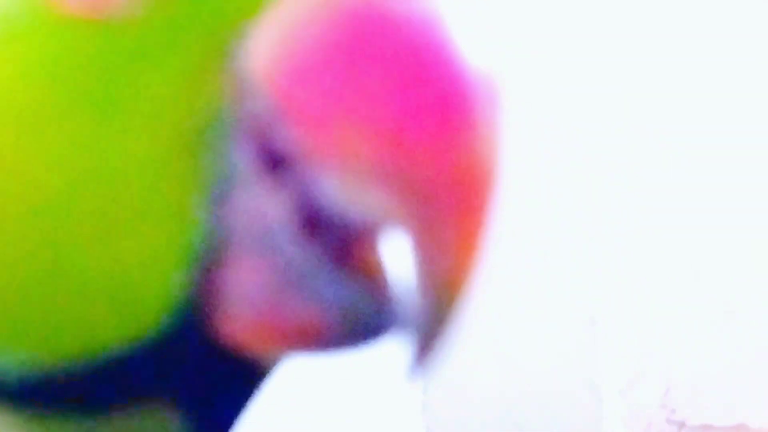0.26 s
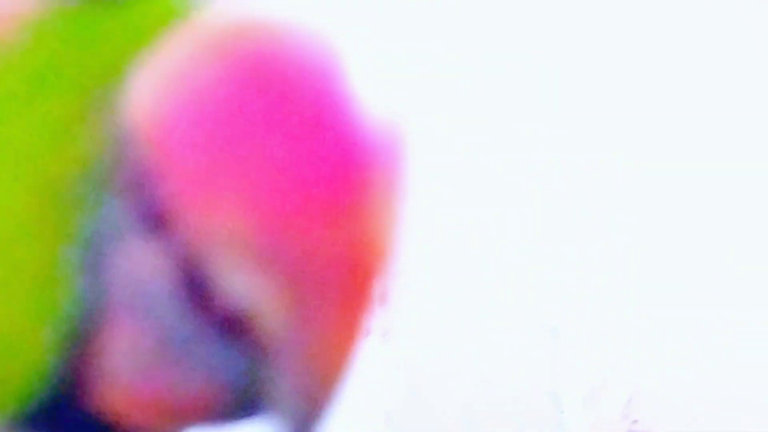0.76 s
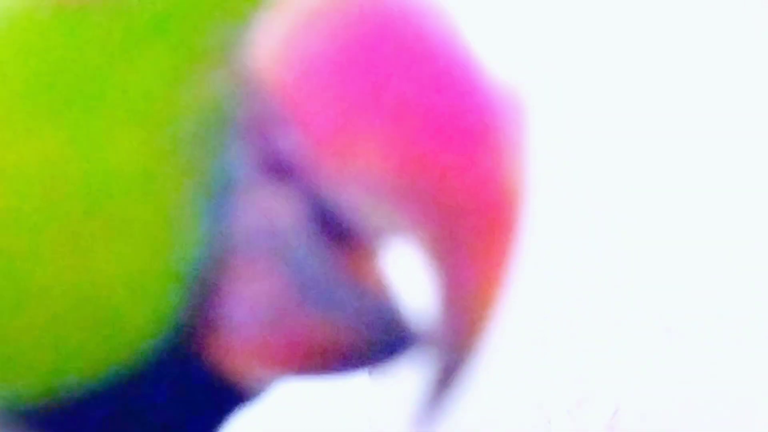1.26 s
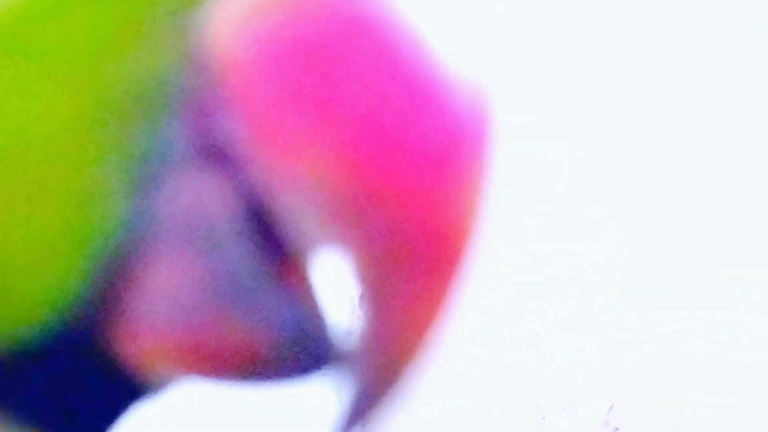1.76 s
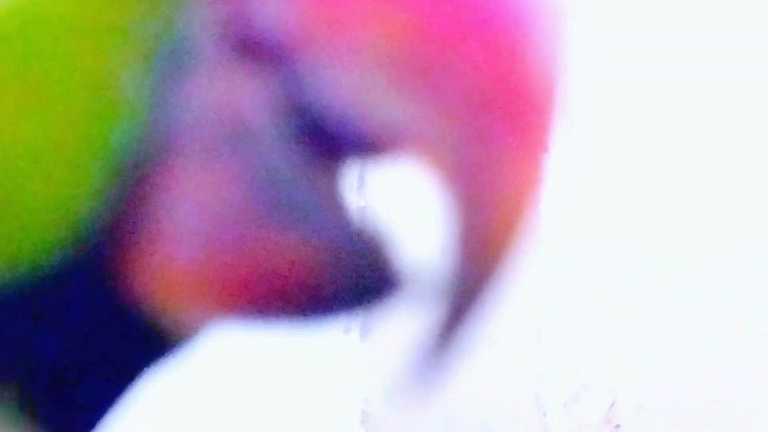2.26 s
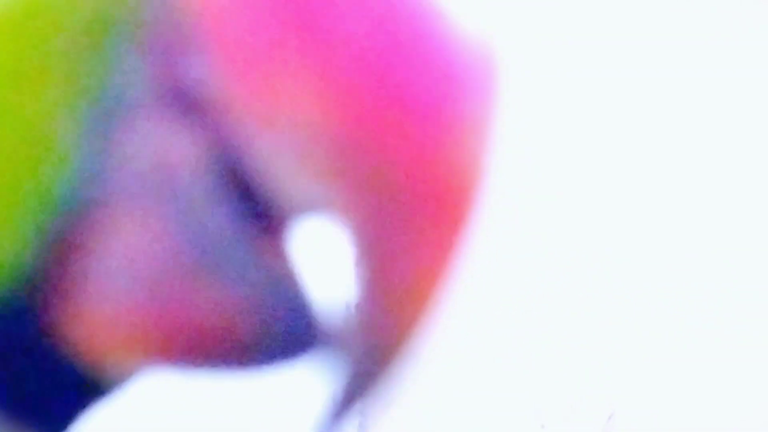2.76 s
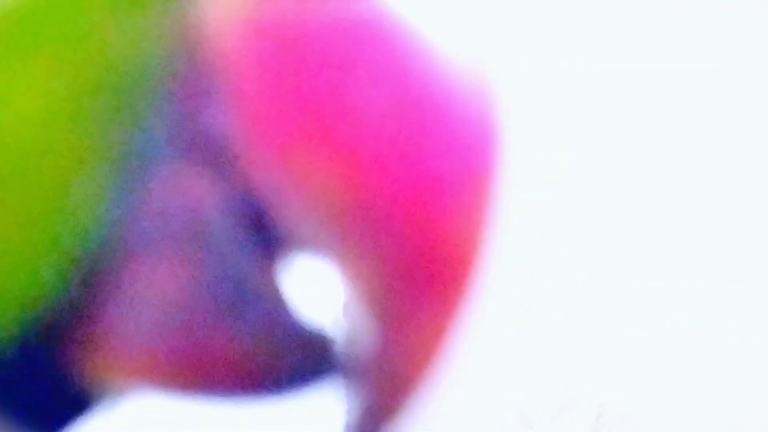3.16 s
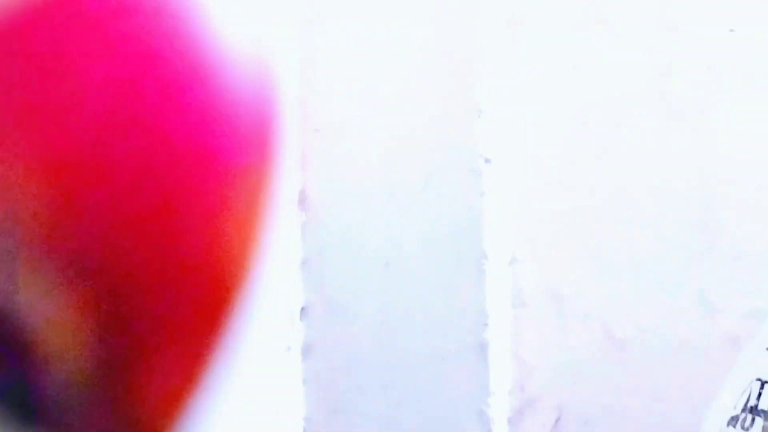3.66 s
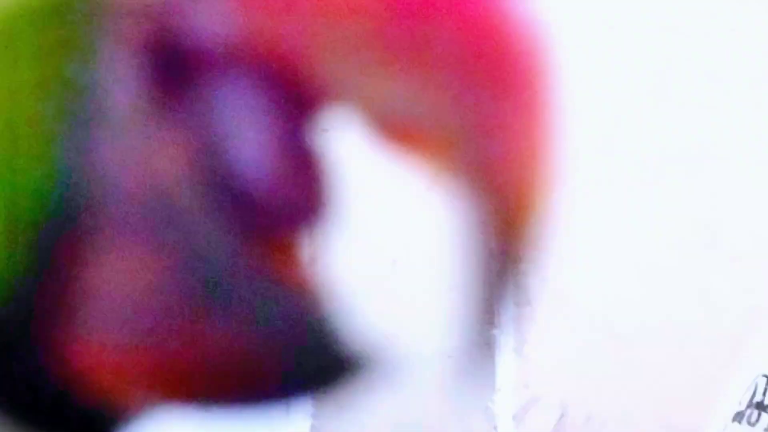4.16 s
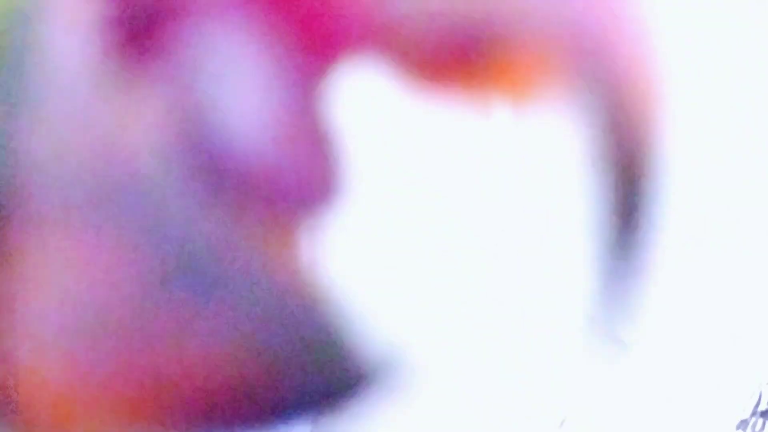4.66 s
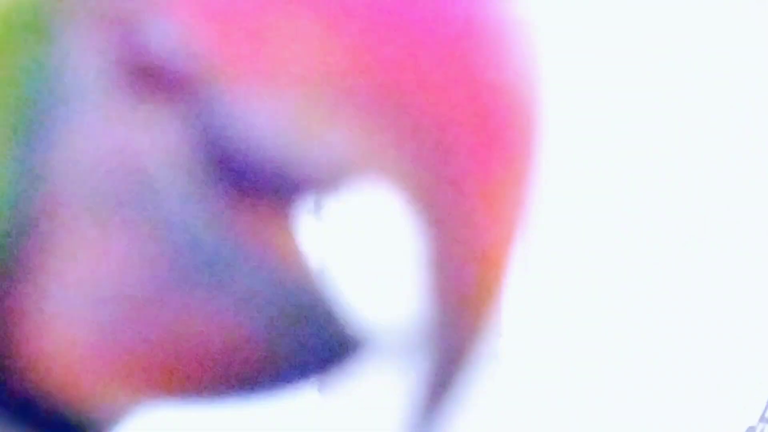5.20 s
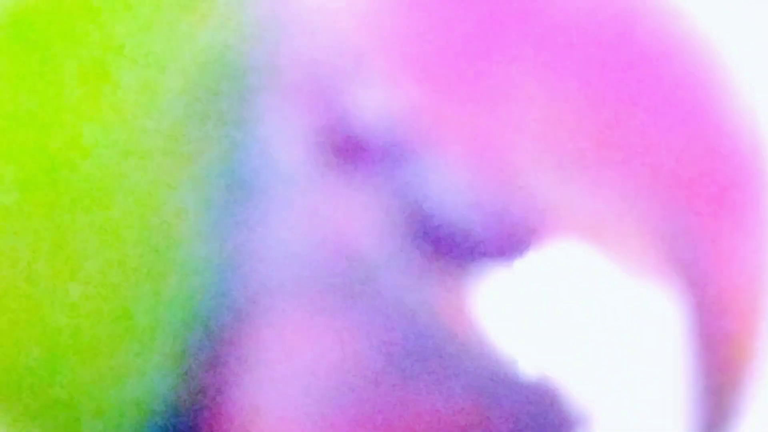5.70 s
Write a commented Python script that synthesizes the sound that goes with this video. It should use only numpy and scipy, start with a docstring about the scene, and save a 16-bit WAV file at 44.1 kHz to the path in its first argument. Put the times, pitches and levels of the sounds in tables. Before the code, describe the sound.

A pet parakeet calls beside the microphone in a small room with a short ring. A low motor-like hum and soft rumble waver throughout. From the start to about 0.85 s come four short raspy screeches, roughly a quarter second apart, each scooping up quickly and sagging, slightly to the right. Three similar ones follow at 1.4, 1.65 and 1.9 s, the first breaking briefly into a whistle. A soft thump falls near 2.2 s; then the bird pauses, with faint gliding chirps behind. At 3.15 s a much louder, clear, dry call rises and falls for a third of a second, cracking into a high whistle; a shorter one follows at 3.6 s, both opening with tiny ticks. Quiet chirps again, then two softer, lower, rounder yelps at 4.7 and 4.95 s. Low bumps land around 5.1 to 5.2 s, and hum with fading chirps remains until 6 s.

```python
"""A pet parakeet calls in four bouts near the microphone in a small room: seven raspy screeches, two loud clear
calls, two softer yelps. Each is a bank of unsteady partials and pulsed noise, shaped by throat and head direction;
three break into a whistle.
Around them: faint gliding chirps, filtered-noise ticks and soft low thumps, over wavering hum tones and
a rumble of noise bands."""
import sys
import numpy as np
from scipy import signal
from scipy.fft import rfft, irfft, next_fast_len
from scipy.io import wavfile
from scipy.ndimage import uniform_filter1d

SR = 44100
rng = np.random.default_rng(int(sys.argv[2]) if len(sys.argv) > 2 else 0)


def master(y):
    """Save y as 16-bit WAV."""
    cut = np.clip(np.atleast_2d(y).T, -1, 1)
    pcm = np.round(cut * 32767)  # scale
    wavfile.write(sys.argv[1], SR, pcm.astype(np.int16))


N = 261954
TIME_S = np.arange(N) / SR
SIDES = np.array([[1], [-1]])   # left, right
CUTOFF_HZ = 15300   # top of the partials and of the output


def from_db(db):
    """Decibels to amplitude gain."""
    return np.exp(np.asarray(db) * (np.log(10) / 20))


def rms_one(x):
    """Scale to rms 1."""
    return x / np.sqrt(np.mean(x ** 2) + 1e-20)


def at_hz(points, hz, axis=1):
    """Interpolate one column of a spectrum on a log-frequency axis."""
    points = np.array(points)
    return np.interp(np.log(np.maximum(hz, 1)), np.log(points[:, 0]), points[:, axis])


def butter(x, hz, kind, order=2):
    """Butterworth filter."""
    return signal.sosfilt(signal.butter(order, hz, kind, fs=SR, output="sos"), x)


def drift(rate_hz, size):
    """Random curve of spread 1 that moves at about this rate."""
    knots = rng.standard_normal(int(2 * rate_hz * size / SR) + 3)
    curve = np.interp(np.arange(size) * 2 * rate_hz / SR, np.arange(len(knots)), knots)
    return curve * np.sqrt(3 / 2)   # restores the spread lost between knots


def panned(pan_db):
    """Left and right gains that keep the power; positive is left."""
    gains = from_db(SIDES * pan_db / 2)
    return gains / np.sqrt(np.mean(gains ** 2, axis=0))


def evened(x, size=300):
    """Hold each channel near rms 1 from moment to moment."""
    return x / np.sqrt(np.abs(uniform_filter1d(x ** 2, size, axis=-1)) + 1e-12)


def add(out, start_s, sound):
    """Mix a sound in at its time."""
    at = max(round(start_s * SR), 0)
    out[:, at:at + sound.shape[-1]] += sound[..., :max(N - at, 0)]


def echoes(t60_s, delay_s, dull_hz):
    """Dense decaying reflections of unit energy, different in each channel."""
    t = TIME_S[:SR // 2]
    noise = butter(rng.standard_normal((2, len(t))), dull_hz, "low", order=1)
    tail = noise * from_db(-60 * t / t60_s) * (t > delay_s)
    return rms_one(tail) / np.sqrt(len(t))


# room noise spectrum: f/Hz, relative density/dB per Hz
RUMBLE_SPECTRUM = [(22, 4), (36, -2.5), (62, -1), (100, -8), (150, -9.5), (250, -11.5), (330, -17.5),
                   (500, -18), (750, -31), (1100, -31), (2300, -36), (4000, -44.5), (8000, -58.5),
                   (15000, -58.5)]
# correlation of the channels: f/Hz, likeness/0-1
RUMBLE_LIKENESS = [(60, 0.61), (125, 0.79), (250, 1), (500, 0.71), (950, .15), (2400, .02), (15000, 0.028)]
# channel balance: f/Hz, left-right/dB
RUMBLE_BALANCE = [(60, 4.5), (150, 2.5), (380, 3.5), (950, -1), (2380, -5), (5980, 2), (15000, 1.5)]
RUMBLE_DB = -32.25   # of the channel mean


def rumble(patchy_db):
    """Half-octave noise bands, most alike in both channels near 250 Hz, each flickering a little."""
    out, edges_hz = 0, 16 * 2 ** (np.arange(21) / 2)
    white = rng.standard_normal((2, 2, N))
    for k, (low_hz, high_hz) in enumerate(zip(edges_hz, edges_hz[1:])):
        mid, side = butter(white[k % 2], [low_hz, high_hz], "band")   # neighbours use separate noise
        hz = np.sqrt(low_hz * high_hz)
        alike = np.clip(at_hz(RUMBLE_LIKENESS, hz), 0, .99)
        stereo = mid + np.sqrt((1 - alike) / (1 + alike)) * side * SIDES
        level_db = at_hz(RUMBLE_SPECTRUM, hz) + patchy_db * drift(6, N)
        out = out + from_db(level_db) * panned(at_hz(RUMBLE_BALANCE, hz)) * stereo
    return from_db(RUMBLE_DB) * out / np.std(out.mean(axis=0))


# hum tones: f/Hz, mean level/dB rms
HUM_TONES = [(102.3, -41.5), (188.4, -42.5), (463.0, -54.5)]


def hum(waver_rad, pan_db):
    """Low motor-like sines that waver in phase, more so when higher, and in strength."""
    tones = 0
    for hz, level_db in HUM_TONES:
        wander = waver_rad * np.sqrt(hz / 100) * drift(5, N)
        strength = from_db(level_db + 2 * drift(3.7, N))
        tones = tones + strength * np.sin(2 * np.pi * hz * TIME_S + wander)
    return np.sqrt(2) * tones * panned(pan_db)


# soft thumps: peak t/s, f/Hz, peak level/dB, 1/e energy decay to either side/s
THUMP_EVENTS = [(2.17, 70.3, -17, 0.0038), (4.6, 70, -23, 0.0038), (5.091, 119, -10.5, 0.002),
                (5.136, 87, -27, 0.02), (5.212, 76.5, -20, 0.0046)]


def thumps():
    """Low tones that swell and die symmetrically about their peaks."""
    out, t = np.zeros((2, N)), TIME_S[:SR // 4]
    centred = t - t.mean()
    for peak_s, hz, peak_db, decay_s in THUMP_EVENTS:
        envelope = from_db(peak_db) * np.exp(-np.abs(centred) / (2 * decay_s))
        add(out, peak_s - t.mean(), envelope * np.cos(2 * np.pi * hz * centred))
    return out


# dry ticks: t/s, initial level before decay/dB, t60/s; level is that of the noise before its band-pass
TICK_EVENTS = [(1.076, -46, 0.42), (1.259, -48, .08), (3.141, -18, 0.031), (3.512, -44, 0.5),
               (3.593, -19, .025), (4.67, -26.5, .025), (4.925, -33, .025), (5.771, -64, .08)]


def ticks():
    """Bright noise bursts with exponential decay."""
    out, t = np.zeros((2, N)), TIME_S[:SR // 4]
    for start_s, level_db, t60_s in TICK_EVENTS:
        noise = butter(rng.standard_normal((2, len(t))), [2000, 9000], "band", order=1)
        add(out, start_s, noise * from_db(level_db - 60 * t / t60_s))
    return out


TWITTER_FROM_S, TWITTER_TO_S, TWITTER_LENGTH_S = 2.2, 5.8, 0.074
TWITTER_LOW_HZ, TWITTER_HIGH_HZ, TWITTER_HALF_WIDTH_HZ = 2500, 5160, 110
TWITTER_FALL = .06   # share of its pitch each chirp drops
TWITTER_DB, TWITTER_FADE_DB_PER_S = -50, 3.6   # before the chirp gain


def twitter(count):
    """Rows of short falling chirps at random times and pitches, slowly growing fainter."""
    when, height = rng.random((count, 2)).T
    after_s = (np.arange(count) + when) / count * (TWITTER_TO_S - TWITTER_FROM_S)
    pitches_hz = TWITTER_LOW_HZ * (TWITTER_HIGH_HZ / TWITTER_LOW_HZ) ** height
    rows = []
    for s, hz in zip(after_s, pitches_hz):
        start_s, level_db = TWITTER_FROM_S + s, TWITTER_DB - TWITTER_FADE_DB_PER_S * s
        rows.append((start_s, start_s + TWITTER_LENGTH_S, hz, hz * (1 - TWITTER_FALL),
                     TWITTER_HALF_WIDTH_HZ, level_db))
    return rows


# clearest chirps: start t/s, end t/s, first f/Hz, last f/Hz, half-width/Hz, level before chirp gain/dB
CLEAR_CHIRPS = [(2.324, 2.414, 4040, 3520, 290, -49.5), (2.37, 2.479, 3064, 2450, 55, -40),
                (2.418, 2.633, 4500, 4670, 720, -45.5), (2.642, 2.679, 3290, 3340, 16.4, -39),
                (2.667, 2.775, 5300, 4190, 460, -48), (2.836, 2.885, 4800, 5120, 104, -42.5),
                (2.966, 3.122, 3580, 2840, 530, -46), (3.013, 3.107, 6900, 5600, 60, -49),
                (3.873, 4.003, 4750, 4380, 230, -46), (4.079, 4.113, 5870, 5930, 21, -51.5),
                (4.167, 4.29, 2510, 2600, 110, -49), (4.533, 4.587, 1404, 1370, 12, -45.5),
                (5.024, 5.117, 3220, 3170, 14, -46), (5.092, 5.491, 2497, 2400, 15.4, -53)]


def chirps(gain_db):
    """Faint glides times low-passed complex noise: wide ones husky, narrow ones pure."""
    out = np.zeros((2, N))
    for start_s, end_s, first_hz, last_hz, half_width_hz, level_db in CLEAR_CHIRPS + twitter(count=18):
        size = max(int((end_s - start_s) * SR), 2)
        glide = np.exp(2j * np.pi * np.cumsum(np.linspace(first_hz, last_hz, size)) / SR)
        shape = (2, size + SR // 4)   # extra lets the filter settle
        noise = rng.standard_normal(shape) + 1j * rng.standard_normal(shape)
        blur = butter(noise, half_width_hz, "low", order=3)[:, -size:]
        chirp = (glide * blur).real * signal.windows.tukey(size, .6)
        add(out, start_s, from_db(level_db + gain_db) * rms_one(chirp))
    return out


def syrinx(pitch, rasp, jitter, flutter_hz, smear, odd_db, hiss_hz, hiss_db, air_db):
    """Vibrating membranes: with rasp their cycles grow uneven and pulsed turbulence replaces the tone."""
    size = len(pitch)
    uneven = pitch * (1 + jitter * (0.078 + rasp) * drift(flutter_hz, size))
    phase = 2 * np.pi * np.cumsum(uneven) / SR
    # odd_db applies to odd partials above the first, in the middle register only
    odd_gain = from_db(odd_db * np.interp(pitch, [1107, 1584, 1974, 2574], [0, 1, 1, 0]))
    tone = 0
    for k in np.arange(20) + 1:
        hz = k * pitch
        # high partials fray first, and swell and fade on their own
        blur = smear * (hz / 9000) ** 1.6 * (0.46 + rasp) * drift(flutter_hz, size)
        strength = from_db(np.minimum(hz / 1800, 4) * drift(34.8, size)) * (hz < CUTOFF_HZ)
        if k % 2 and k > 1:
            strength = strength * odd_gain
        tone = tone + strength * np.cos(k * phase + np.pi * k * k / 7 + blur)
    tone = tone * 2 * np.sqrt(pitch / SR)   # same power per Hz at every pitch
    air = rng.standard_normal(size) * (1 + 0.71 * np.cos(phase)) * from_db(2 * drift(300, size))
    air = air + from_db(hiss_db) * butter(air, hiss_hz, "high")   # turbulence grows toward the treble
    # slack membranes swing widely at the fundamental
    scoop = np.interp(pitch, [1000, 1500], [1.3, 0]) * np.cos(phase)
    return np.sqrt(1 - rasp ** 2) * tone + from_db(air_db) * rasp ** 1.14 * air + scoop


TREBLE_HZ = 5200   # split between body and treble


def squawk(call, throat, near_db, near_t60_s, treble_pan_db, **voice):
    """One call through the throat and off nearby surfaces, following its level and brightness."""
    s = call[:, 0]
    t = np.arange(s[0] - .002, s[-1] + 0.021, 1 / SR)
    pitch, level_db, treble_db, rasp, pan_db = (np.interp(t, s, column) for column in call.T[1:])
    size = next_fast_len(len(t) + SR // 8)
    hz = np.arange(size // 2 + 1) * SR / size
    source = rfft(syrinx(pitch, np.clip(rasp, .02, .97), **voice), size) * from_db(at_hz(throat, hz))
    direct = np.exp(.5j * SIDES * at_hz(throat, hz, axis=2))
    # the treble is beamed past the microphone, so more of it arrives by reflection
    reflected = from_db(near_db) * np.sqrt(1 + (hz / 6000) ** 2)
    near_echo = rfft(echoes(near_t60_s, 0.00022, 18000), size)
    paths = (direct + reflected * near_echo) / np.sqrt(1 + reflected ** 2)
    sound = butter(irfft(source * paths, size)[:, :len(t)], 600, "high", order=4)
    body = evened(butter(sound, TREBLE_HZ, "low", order=8)) * panned(pan_db)
    treble = evened(butter(sound, TREBLE_HZ, "high", order=8)) * panned(treble_pan_db) * from_db(treble_db)
    gate = np.interp(t, [t[0], s[0], s[-1], t[-1]], [0, 1, 1, 0])
    shaped = (body + treble) * from_db(level_db) * gate
    return t[t >= 0][0], shaped[:, t >= 0]


# whistles within calls: start t/s, end t/s, first f/Hz, middle f/Hz, last f/Hz, attack/s, middle level/dB,
# treble re level/dB, middle rasp/0-1, left-right/dB
WHISTLE_EVENTS = [(1.386, 1.453, 3707, 3736, 3240, 0.0074, -17.5, -9.5, 0.07, -18),
                  (3.271, 3.399, 3200, 3431, 3200, .002, -13.5, -10, .05, -1),
                  (3.605, 3.676, 3494, 3358, 2984, .003, -12.5, -15.5, .14, -2.5)]
BREAK_S = 0.0044   # jump into and out of a whistle
WHISTLE_EDGE_DB, WHISTLE_EDGE_RASP = 3, 0.21   # level loss and added rasp at its ends
WHISTLE_ONSET_DB = 10.5   # initial deficit, recovered over the attack
CRACK_S, CRACK_DB, CRACK_RASP = .005, 5.5, .3   # around each jump the body falters and rasps
PULL, PULL_S = .17, .014   # share drawn toward a whistle just outside it; decay time


def whistled(s, controls):
    """Where a whistle falls within a call, the voice cracks, jumps to it and cracks back."""
    for (start_s, end_s, first_hz, middle_hz, last_hz, attack_s,
         level_db, treble_db, rasp, pan_db) in WHISTLE_EVENTS:
        arch, inside_s = np.interp(s, [start_s, end_s], [-1, 1]), np.minimum(s - start_s, end_s - s)
        bend_hz = (first_hz + last_hz) / 2 - middle_hz
        pitch = middle_hz + (last_hz - first_hz) / 2 * arch + bend_hz * arch ** 2
        onset_db = WHISTLE_ONSET_DB * np.exp(-np.maximum(s - start_s, 0) / attack_s)
        level = level_db - WHISTLE_EDGE_DB * arch ** 2 - onset_db
        edge_rasp = rasp + WHISTLE_EDGE_RASP * arch ** 2
        whistle = np.array(np.broadcast_arrays(pitch, level, treble_db, edge_rasp, pan_db))
        pull = PULL * np.exp(np.minimum(inside_s, 0) / PULL_S)
        share = np.clip(inside_s / BREAK_S + .5, pull, 1)
        crack = np.exp(-(inside_s / CRACK_S) ** 2)
        controls = controls + share * (whistle - controls)
        controls = controls + np.outer([0, -CRACK_DB, CRACK_DB, CRACK_RASP, 0], crack)
    return controls


START_HZ, END_HZ = 666.6, 1149   # slack membranes at either end of a call
SCOOP_EASE, COLLAPSE_EASE = 1.4, 1.2   # the rise slows toward the knee; the level falls ever faster
ONSET_DB = 21   # initial deficit, recovered over the attack
SLACK_RASP, FRAY_S = 0.95, 0.025   # rasp of slack membranes; time the tone takes to fray
RASP_SPREAD = .5   # share of the left-right difference that a noisy voice loses
# strained at high pitch, the voice grows rougher and its body louder
STRAIN_FROM_HZ, STRAIN_FULL_HZ, STRAIN_RASP, STRAIN_BOOST_DB = 2050, 2600, 0.22, 1
OPENING_S, OPENING_DB = 0.0064, 6   # the treble comes a little late, as the beak opens


def gesture(call, fall_s, release_db, clear_s, fray_before_s, roughen, brighten_db, rasp_treble_db):
    """One call as rows of (s, pitch, level, treble, rasp, pan): it starts rough, clears, and frays as it dies."""
    (start_s, length_s, knee_s, turn_s, knee_hz, turn_hz, last_hz, attack_s,
     level_db, change_db, treble_db, held_rasp, pan_db) = call
    t = np.linspace(0, length_s, 400)
    last_s, along = length_s - fall_s, t / length_s - .5
    pitch = np.interp(t, [knee_s, turn_s, last_s, length_s], [knee_hz, turn_hz, last_hz, END_HZ])
    pitch = pitch - (knee_hz - START_HZ) * np.maximum(1 - t / knee_s, 0) ** SCOOP_EASE
    strain = np.interp(pitch, [STRAIN_FROM_HZ, STRAIN_FULL_HZ], [0, 1])
    fray = np.clip((t - length_s + fray_before_s) / FRAY_S + .5, 0, 1)
    slack = np.maximum(1 / (1 + (t / clear_s) ** 3), fray)
    collapse = np.clip((t - last_s) / fall_s, 0, 1) ** COLLAPSE_EASE
    level = level_db - ONSET_DB * np.exp(-t / attack_s) + change_db * along
    level = level - release_db * collapse + STRAIN_BOOST_DB * strain
    rasp = (held_rasp + roughen * along + STRAIN_RASP * strain) * (1 - slack) + SLACK_RASP * slack
    treble = treble_db + brighten_db * along + rasp_treble_db * slack
    treble = treble - STRAIN_BOOST_DB * strain - OPENING_DB * np.exp(-t / OPENING_S)
    controls = np.array([pitch, level, treble, rasp, pan_db * (1 - RASP_SPREAD * slack)])
    return np.vstack([start_s + t, whistled(start_s + t, controls)]).T


def bout(calls, throat, room_db, shimmer_db, manner, **voice):
    """A run of calls in one manner, trembling in strength, with the room's short ring behind them."""
    out = np.zeros((2, N))
    room = from_db(room_db) * echoes(0.35, 0.0067, 6500)
    for call in calls:
        start_s, sound = squawk(gesture(call, **manner), throat, **voice)
        sound = sound * from_db(shimmer_db * drift(72.2, sound.shape[1]))
        add(out, start_s, sound)
        add(out, start_s, signal.fftconvolve(sound, room, axes=1))
    return out


# the main voice, carrying on faintly beneath the whistle on its own pitch: t/s, f/Hz, peak level/dB
HIDDEN_VOICE_PATH = [(3.607, 2480, -35.5), (3.62, 2550, -25.5), (3.64, 2620, -24.5), (3.655, 2510, -28.5),
                     (3.669, 2000, -25.5), (3.679, 1560, -34), (3.705, 1460, -39)]


def hidden_voice():
    """A weaker, slightly unsteady sine that rises briefly, then sags beneath the whistle."""
    s, hz, level_db = np.transpose(HIDDEN_VOICE_PATH)
    t, out = np.arange(s[0], s[-1], 1 / SR), np.zeros((2, N))
    pitch = np.interp(t, s, hz) * (1 + .022 * drift(400, len(t)))
    add(out, s[0], from_db(np.interp(t, s, level_db)) * np.sin(2 * np.pi * np.cumsum(pitch) / SR))
    return out


# throat, beak and head direction in each bout: f/Hz, level/dB, left lead/rad
FIRST_BOUT_THROAT = [(715, -15.5, -5), (1400, -20, 4), (1890, -10, -0.2), (2500, 1.5, 4.5), (3050, -0.5, 6),
                     (3370, 2.5, 3.5), (4680, -9.5, 2), (5530, -15, 5.5), (6540, -13, 4.5),
                     (9100, -15.5, -0.5), (10500, -20, 2.5), (13100, -21.5, 5), (14900, -27.5, 4)]
SECOND_BOUT_THROAT = [(667, -28, 1), (1180, -21.5, 1.5), (1830, -15.5, 1.5), (2510, -0.5, 2.5),
                      (2800, -5, 6), (3660, -0.5, 0.5), (4670, -5.5, 3.5), (4850, -11.5, 3.5),
                      (7460, -9.5, 6.5), (9500, -14, 14.5), (11440, -17.5, 6.5), (12100, -14.5, 14),
                      (15000, -29, 9)]
LOUD_BOUT_THROAT = [(700, -26, -13), (1120, -23, 1.3), (1940, -14, 0.3), (2334, -1.5, -0.4),
                    (2690, -14.5, -3), (3460, -1.5, 1.37), (4550, -3.5, 1.2), (5420, -6.5, -4.46),
                    (6540, -16, 2), (8150, -16.5, -0.1), (9710, -22, 0.1), (12800, -28, 4),
                    (15000, -35.5, 4)]
YELP_BOUT_THROAT = [(690, -20, 6), (1196, -25, -2), (1810, -4.5, -1.5), (2630, -3.5, -2.5),
                    (2980, 0.5, -1.1), (3380, -1.5, 2.1), (4400, -11.5, -3.5), (5500, -15, -2),
                    (7430, -15, -1.5), (9550, -36, -12.5), (11100, -23, -7), (13300, -30, -10.5),
                    (15000, -34, 0)]
# calls scoop up to a knee, glide to a turn and on to a last pitch, then collapse; knee and turn from call start:
# start t/s, length/s, knee t/s, turn t/s, knee f/Hz, turn f/Hz, last f/Hz, attack/s, level/dB,
# level change over call/dB, treble re level/dB, held rasp/0-1, left-right/dB
CALLS = [(-0.095, 0.17, 0.044, 0.059, 2485, 1940, 1767, .012, -26.5, -2, 0, 0.21, -10),
         (0.16, 0.17, 0.04, 0.069, 2660, 1870, 1622, 0.0092, -26.5, -0.5, 2, .33, -4.5),
         (0.417, 0.16, 0.046, .066, 2490, 1842, 1626, 0.0084, -25, -1.5, 3.5, 0.23, -3),
         (0.682, .16, 0.038, 0.063, 2542, 1802, 1567, 0.011, -24.5, -1.5, .5, 0.21, -7),
         (1.37, 0.18, 0.088, 0.099, 2170, 1896, 1810, 0.023, -24.5, -12.5, -1, 0.27, -8),
         (1.642, 0.18, 0.038, 0.057, 2415, 1912, 1613, 0.042, -23, -7.5, 0.5, 0.2, -8),
         (1.907, 0.17, 0.036, .06, 2250, 1745, 1584, 0.024, -23.5, -7, -2, 0.15, -6.5),
         (3.139, 0.3375, .056, 0.22, 1968, 2606, 1720, 0.0094, -13, -4, -5, 0.17, 1.5),
         (3.568, .2, 0.07, .119, 2540, 2215, 1604, 0.033, -14.5, -10, -4, 0.27, 1),
         (4.667, 0.15, .038, 0.065, 1610, 1762, 1340, 0.013, -19, 9.5, -16, 0, -6),
         (4.922, 0.13, 0.035, 0.065, 1545, 1635, 1287, 0.02, -15.5, 0, -14.5, 0.04, -7)]


def parakeet():
    """Facing away, the bird sounds raspy and roomy; with its beak at the microphone, clear and dry."""
    first = bout(
        CALLS[:4], FIRST_BOUT_THROAT, room_db=-15, shimmer_db=1.18,
        near_db=-6, near_t60_s=0.059, treble_pan_db=-3,
        manner=dict(fall_s=.03, release_db=13.5, clear_s=0.026, fray_before_s=0.029,
                    roughen=0.056, brighten_db=4, rasp_treble_db=-3.5),
        jitter=0.04, flutter_hz=300.2, smear=0.86, odd_db=-5, air_db=-1.5, hiss_hz=4860, hiss_db=4)
    second = bout(
        CALLS[4:7], SECOND_BOUT_THROAT, room_db=-17, shimmer_db=1.7,
        near_db=-7.5, near_t60_s=0.052, treble_pan_db=-4.5,
        manner=dict(fall_s=.033, release_db=12.5, clear_s=0.027, fray_before_s=.03,
                    roughen=0.12, brighten_db=5, rasp_treble_db=-2.5),
        jitter=0.026, flutter_hz=351.7, smear=0.79, odd_db=-8.5, air_db=-1, hiss_hz=7000, hiss_db=7.5)
    loud = bout(
        CALLS[7:9], LOUD_BOUT_THROAT, room_db=-35, shimmer_db=1.03,
        near_db=-8.5, near_t60_s=0.053, treble_pan_db=1,
        manner=dict(fall_s=.026, release_db=28, clear_s=0.036, fray_before_s=0.016,
                    roughen=0.31, brighten_db=4, rasp_treble_db=-1),
        jitter=.02, flutter_hz=447.5, smear=0.61, odd_db=-0.5, air_db=-3, hiss_hz=8030, hiss_db=4.5)
    yelps = bout(
        CALLS[9:], YELP_BOUT_THROAT, room_db=-53, shimmer_db=0.43,
        near_db=-9, near_t60_s=0.046, treble_pan_db=-2,
        manner=dict(fall_s=0.016, release_db=21, clear_s=0.037, fray_before_s=0.0095,
                    roughen=.08, brighten_db=-3.5, rasp_treble_db=2.5),
        jitter=0.022, flutter_hz=454, smear=0.99, odd_db=2, air_db=-7.5, hiss_hz=7900, hiss_db=15.5)
    return first + second + loud + hidden_voice() + yelps


def scene():
    """Background, small sounds and bird; the chirps get a room tail."""
    background = rumble(patchy_db=1.5) + hum(waver_rad=0.72, pan_db=-1)
    faint = chirps(gain_db=-5)
    tail = signal.fftconvolve(faint, echoes(0.28, 0.016, 8000), axes=1)[:, :N]
    return background + thumps() + ticks() + faint + from_db(-9) * tail + parakeet()


OVERLOAD = .86   # ceiling of the rounded peaks, full scale 1


def record(dry):
    """Soft limiting of the highest peaks, then a steep elliptic low-pass."""
    rounded = dry / (1 + (dry / OVERLOAD) ** 6) ** (1 / 6)
    return signal.sosfilt(signal.ellip(12, .1, 90, CUTOFF_HZ, fs=SR, output="sos"), rounded)


dry = scene()
out = record(dry)
master(out)
```